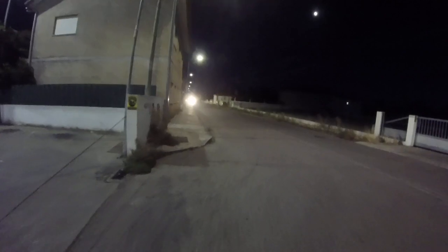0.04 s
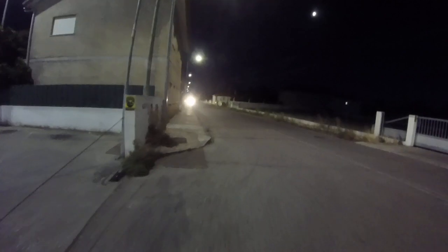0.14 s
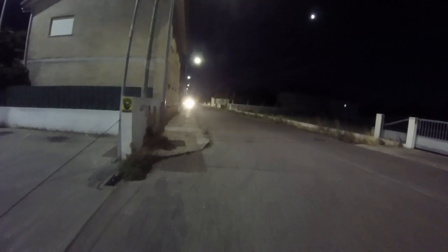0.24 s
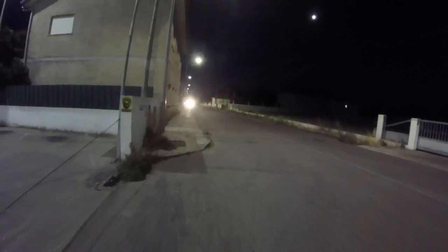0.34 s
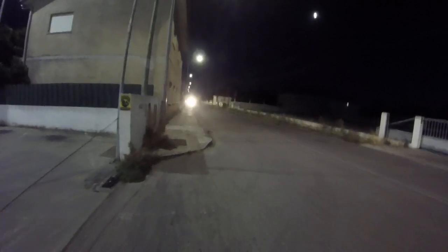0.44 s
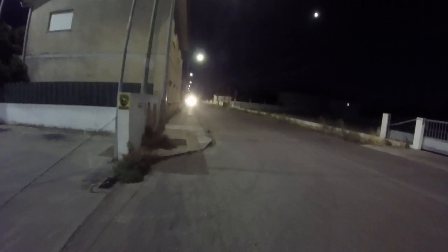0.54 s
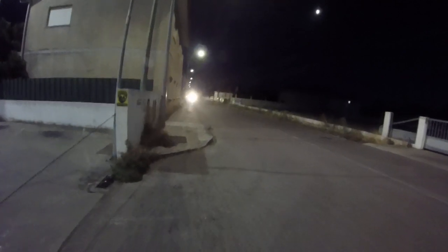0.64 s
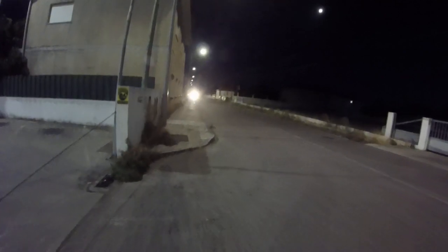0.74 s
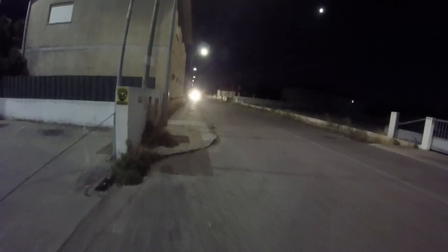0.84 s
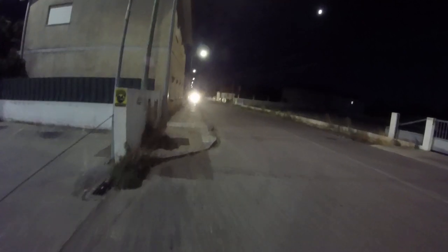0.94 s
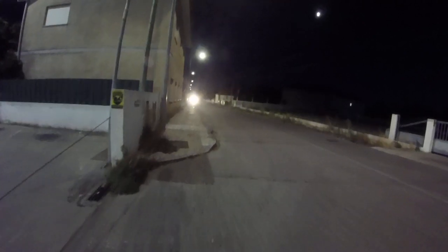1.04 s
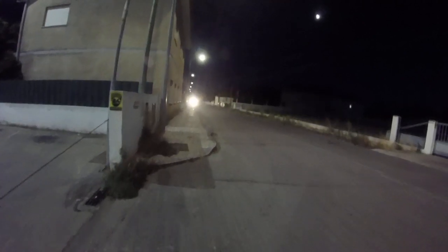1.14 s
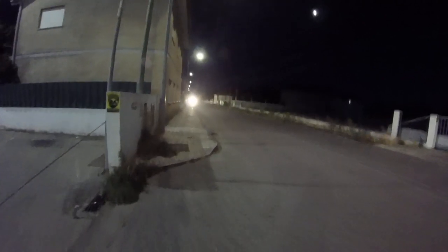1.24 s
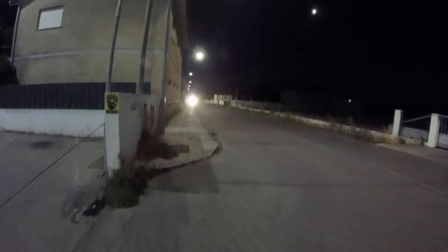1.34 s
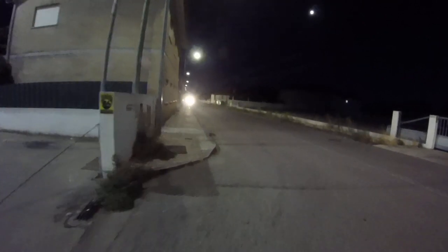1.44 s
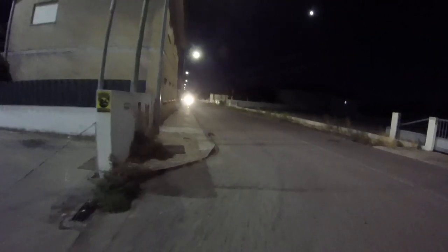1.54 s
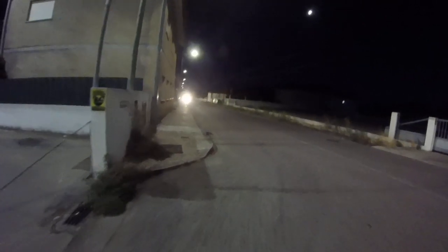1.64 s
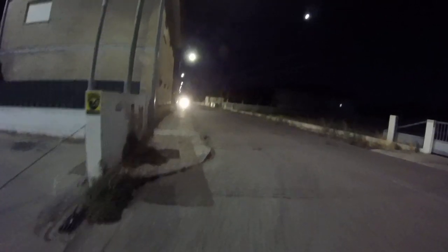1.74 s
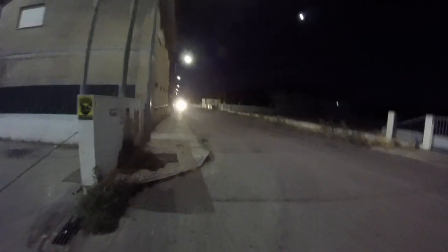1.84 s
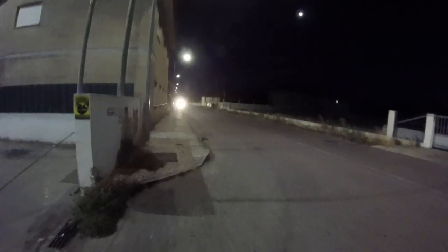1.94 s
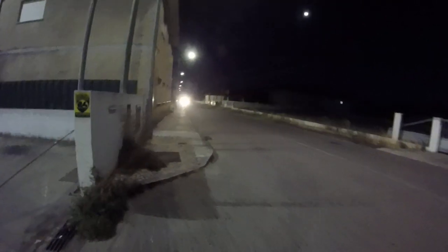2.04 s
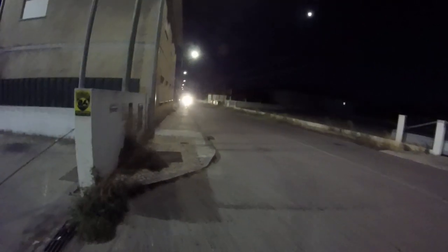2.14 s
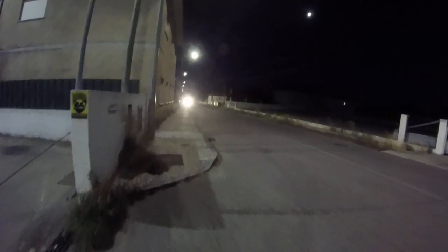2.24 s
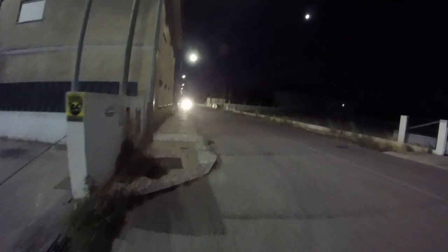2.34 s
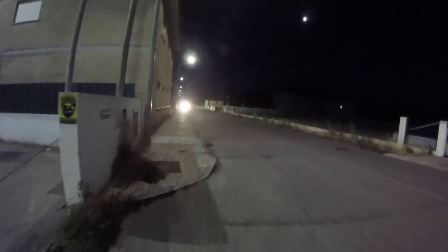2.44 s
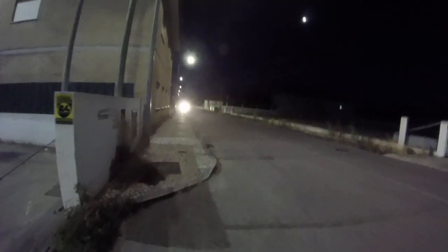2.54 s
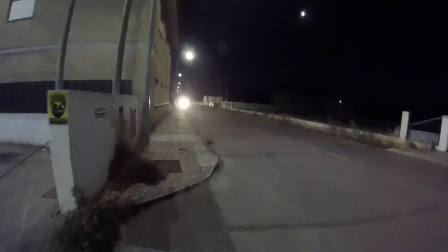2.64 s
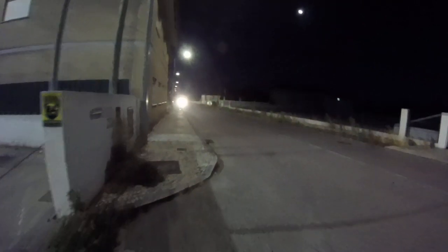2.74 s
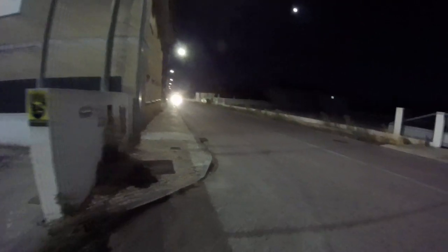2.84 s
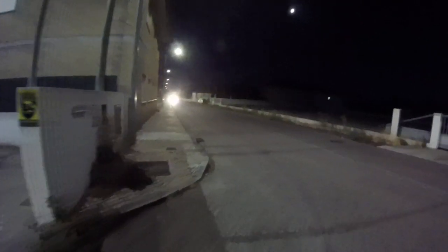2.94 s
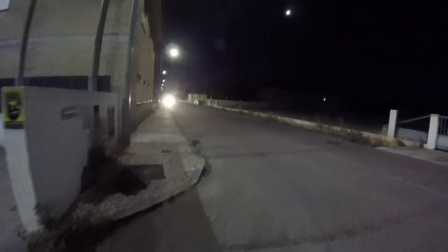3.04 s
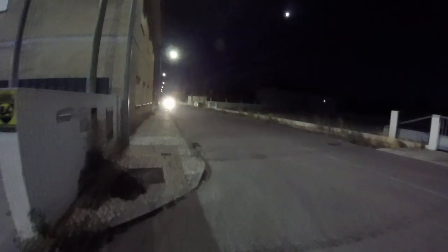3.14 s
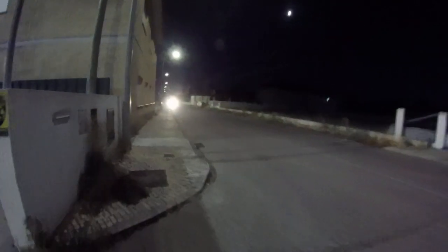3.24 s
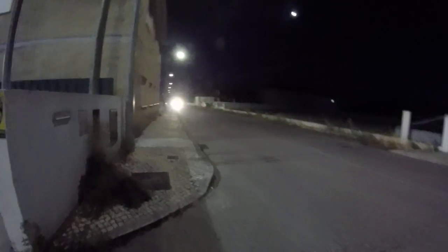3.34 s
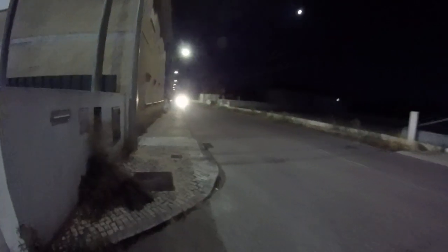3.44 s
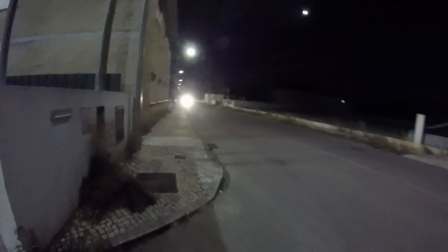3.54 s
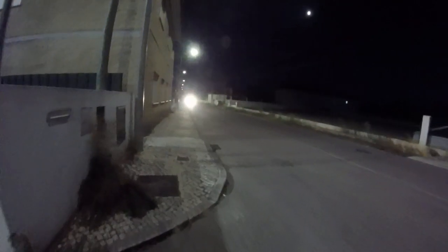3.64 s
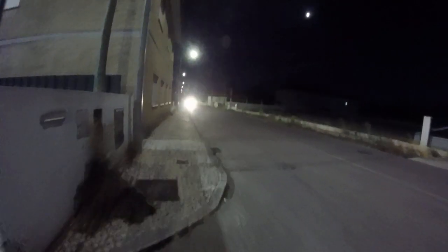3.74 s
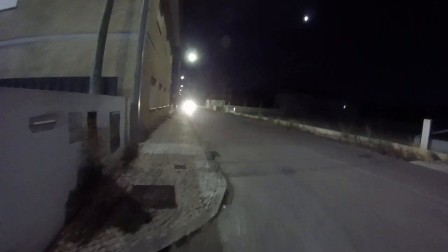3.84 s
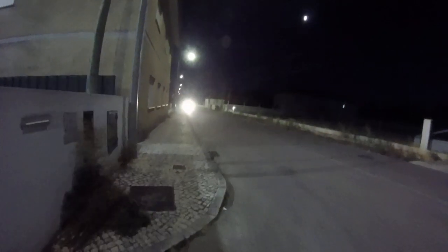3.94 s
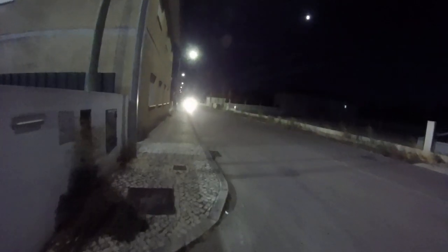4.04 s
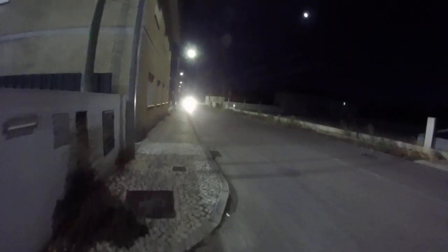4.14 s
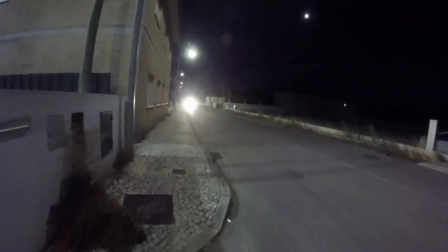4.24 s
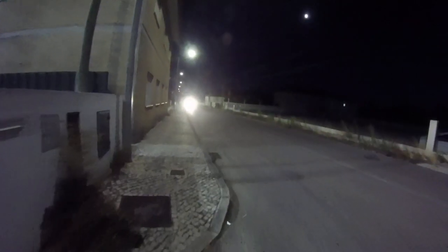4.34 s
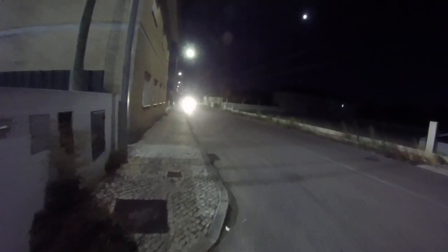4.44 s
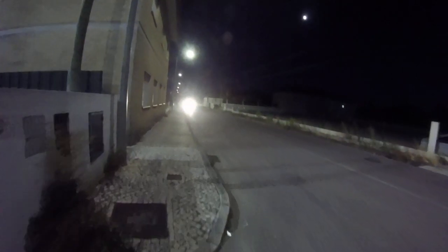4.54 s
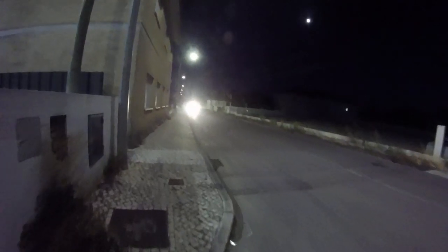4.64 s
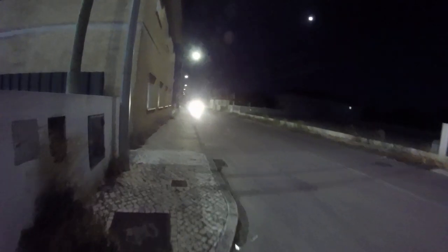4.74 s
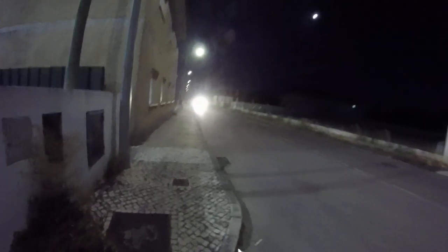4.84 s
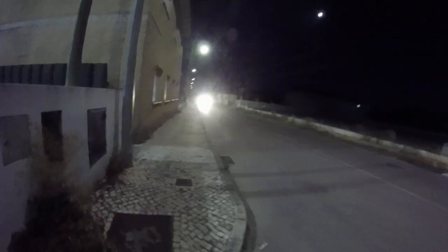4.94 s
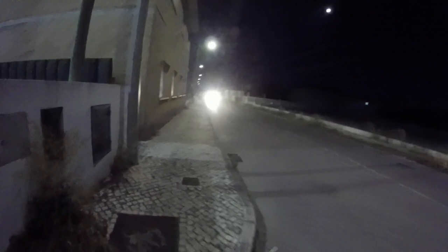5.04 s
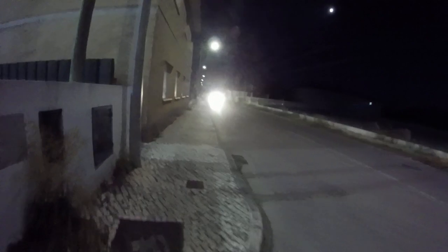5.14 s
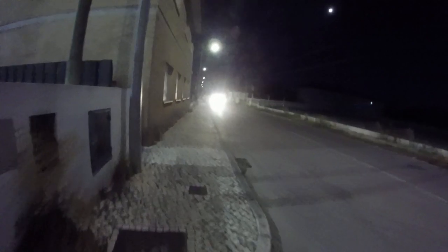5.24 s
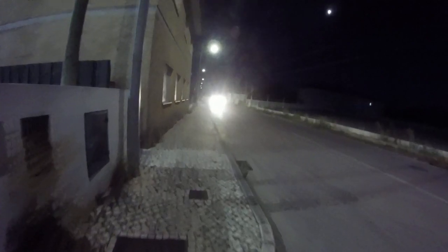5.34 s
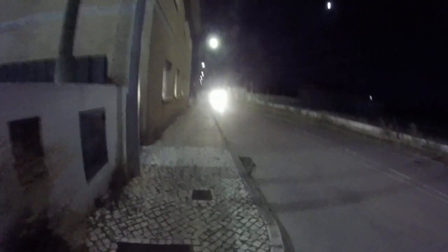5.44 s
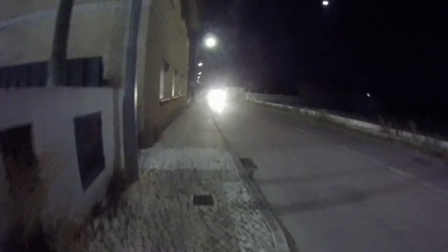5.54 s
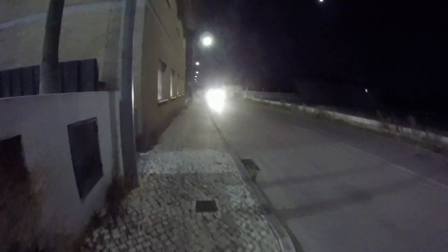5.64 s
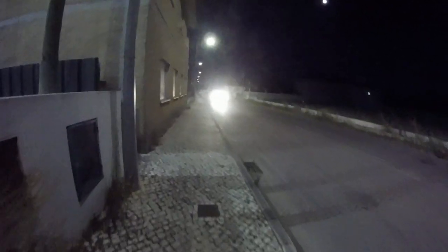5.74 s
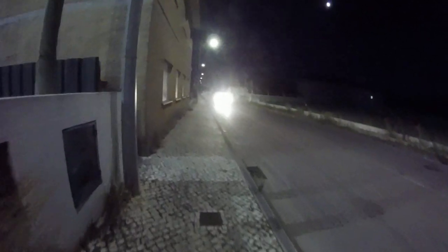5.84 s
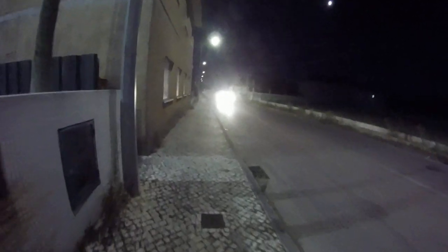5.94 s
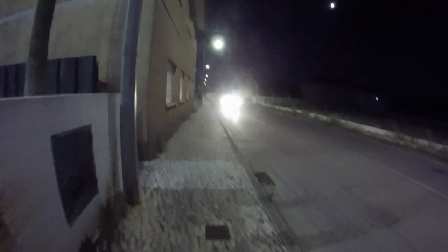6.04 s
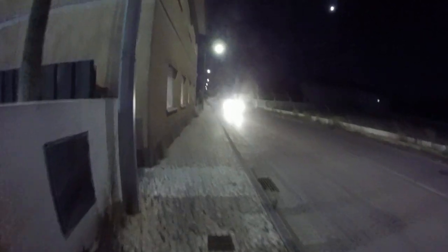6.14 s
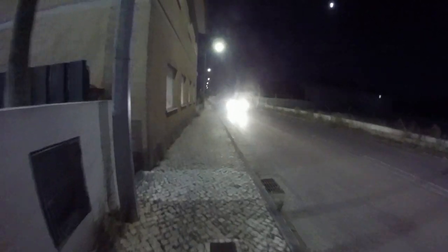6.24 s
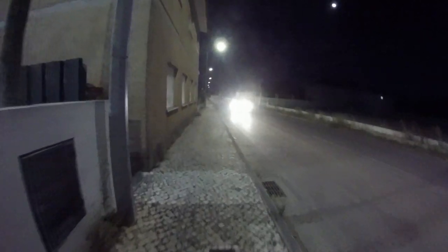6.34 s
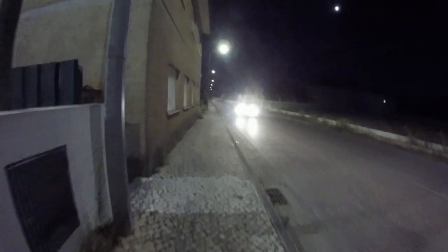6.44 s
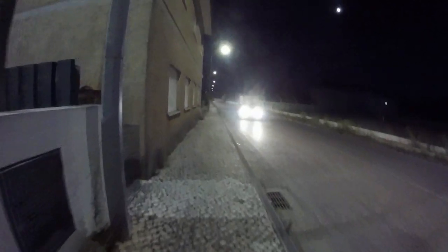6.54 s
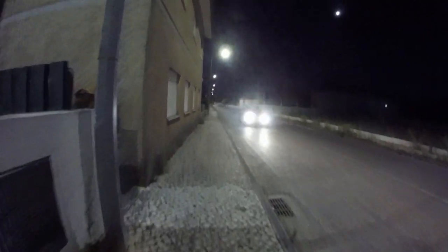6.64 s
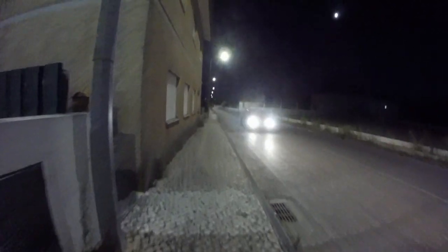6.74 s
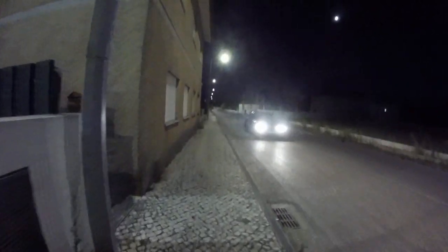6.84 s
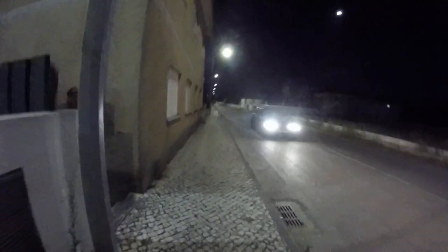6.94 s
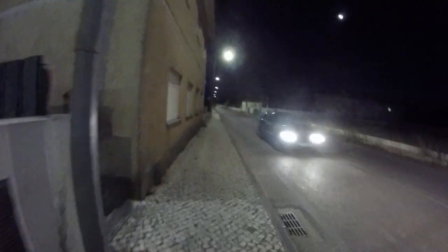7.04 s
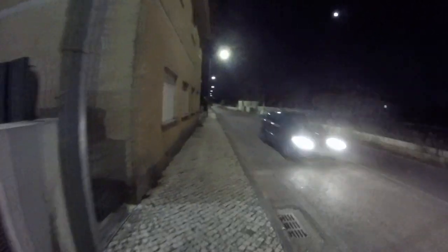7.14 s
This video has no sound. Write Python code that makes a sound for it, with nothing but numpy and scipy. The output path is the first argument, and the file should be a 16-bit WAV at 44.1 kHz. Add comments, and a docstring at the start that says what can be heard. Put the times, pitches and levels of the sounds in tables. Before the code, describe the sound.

Tyre roar and hiss grow steadily as a car draws near, with wind thumping on the microphone partway through.

```python
"""A car approaches at a steady speed along a narrow street at night, heard from the pavement.
Its tyres radiate most of its sound: from afar a roar and a hiss; as the distance falls, a broad wash,
road rumble and the Doppler-shifted hum of the engine join in. A breeze rises to one hard gust whose
turbulence buffets the microphone, brighter the harder it blows. Beneath lies the hush of the town."""
import sys
import numpy as np
from scipy import signal
from scipy.fft import rfft, irfft
from scipy.io import wavfile
from scipy.ndimage import uniform_filter1d, minimum_filter1d, map_coordinates

SR = 44100
rng = np.random.default_rng(int(sys.argv[2]) if len(sys.argv) > 2 else 0)


def persist_wave(psi):
    """Save psi, clipped to +-1, as 16-bit WAV."""
    counts = np.round(np.clip(psi, -1, 1) * 32767).astype(np.int16)
    wavfile.write(sys.argv[1], SR, np.atleast_2d(counts).T)


N = 317079
T = np.arange(N) / SR


def car():
    """Propagation loss: sound grazing the road fades faster than in free air, each part at its own rate."""
    speed_m_s, abreast_at_s, side_m, sound_m_s = 12, 7.33, 6, 343
    reference_m, loss_db_per_decade = 9, 33.5
    ahead_m = speed_m_s * (abreast_at_s - T)
    distance_m = np.hypot(ahead_m, side_m)
    doppler = 1 / (1 - speed_m_s * ahead_m / distance_m / sound_m_s)
    # 0 dB at the reference distance; a part that takes a small share of near_db carries far
    near_db = -loss_db_per_decade * np.log10(distance_m / reference_m)
    tyres = hiss() + wash(near_db) + ring(near_db) + crackle(near_db) + rumble(near_db) + boom()
    return tyres + roar(near_db) + engine(near_db, doppler)


# Spectrum of the drumming tread: f/Hz, level/dB
ROAR_SPECTRUM = [(150, -18.5), (300, -5.5), (400, -15.5), (510, -13.5), (610, -2), (685, 6), (735, 2.5),
                 (810, -4), (870, -6), (940, -18.5), (1010, -18), (1060, -11), (1130, -25), (1250, -26.5),
                 (2000, -48)]
# Surges, slow from afar and quick close by: centre t/s, half-width/s, height/dB, fractional pitch shift
ROAR_SURGES = [(1.8, 0.27, 2.5, 0.00084), (3.1, 0.52, 3.5, 0.000023), (3.845, 0.25, 4.5, 0.0057),
               (5.61, 0.061, 2.5, 0.0034), (6.575, 0.055, 4, 0.07), (6.77, 0.05, 6, -0.0201),
               (6.985, 0.059, 2.5, 0.043)]

def roar(near_db):
    """Impact excitation: tread blocks drum in one hollow band that swells and bends with each surge."""
    surges = np.array([bell(at_s, width_s) ** 2 for at_s, width_s, _, _ in ROAR_SURGES])
    _, _, height_db, shift = np.transpose(ROAR_SURGES)
    sag = .022 * undb(near_db / 2)  # the pitch sinks as the car closes in
    drumming = glide(steady(noise(ROAR_SPECTRUM), span_s=.058), 1 + shift @ surges - sag)
    return drumming * undb(-29 + .86 * near_db + height_db @ surges + .89 * wander(17))


# Spectrum of the air pumped by the tread: f/Hz, level/dB
HISS_SPECTRUM = [(900, -48), (1300, -23), (1550, -23), (1780, -7), (1990, -3.5), (2130, -4), (2330, -20.5),
                 (2550, -25), (2800, -29), (4000, -38.5), (9000, -65)]
# Strength of the hiss: t/s, level/dB
HISS_LEVELS = [(0.0, -63), (0.06, -63), (2.75, -62), (3.3, -55.5), (3.48, -58), (3.72, -53), (4.19, -61.5),
               (4.65, -50), (4.95, -45.5), (5.24, -47.5), (5.42, -42), (5.95, -37.5), (6.31, -37.5),
               (7.06, -33), (7.1, -33.5)]
# Centre of its band: t/s, f/Hz
HISS_CENTRES = [(0, 2068), (4.2, 1987), (4.7, 2064), (5.1, 2078), (5.4, 1980), (5.8, 1989), (6.2, 1909),
                (7.19, 1990)]

def hiss():
    """Air pumping: the tread hisses; reflections off road and wall vary its level and shift its band."""
    unshifted_hz = 2003
    air = glide(noise(HISS_SPECTRUM), curve(HISS_CENTRES) / unshifted_hz)
    return air * undb(curve(HISS_LEVELS) + .5 * wander(25))


# Spectrum of the broad tyre noise: f/Hz, level/dB
WASH_SPECTRUM = [(300, -23), (430, 5.5), (540, -1.5), (850, 6.5), (1150, -5.5), (1600, 0), (2400, -3.5),
                 (2800, -17.5), (3500, -25), (3950, -39), (4450, -18), (5000, -32.5), (6400, -25),
                 (12000, -44.5)]

def wash(near_db):
    """Scintillation: broadband tyre noise wavers as it crosses moving air."""
    return noise(WASH_SPECTRUM) * undb(-33 + 1.052 * near_db + .68 * wander(15))


# Spectrum of the hollow ring in the tyre noise: f/Hz, level/dB
RING_SPECTRUM = [(2500, -14), (2850, -19), (3080, -8.5), (3230, -5), (3350, -6.5), (3520, -12), (3900, -28)]

def ring(near_db):
    """Interference: a hollow ring climbs as the car draws near and its road reflection shifts."""
    lift = .98 + .015 * undb(near_db) ** 2
    return glide(noise(RING_SPECTRUM), lift) * undb(-51.5 + .99 * near_db + 1.8 * wander(22))


# Spectrum of the high tyre crackle, as coloured by the microphone's resonances: f/Hz, level/dB
CRACKLE_SPECTRUM = [(2500, -3), (3950, -5), (4450, 3.5), (5400, 4), (6000, 3), (6450, 8), (7500, -11.5),
                    (8000, 1), (8700, 1), (10000, -9), (11300, -18), (12400, -9), (13800, -25),
                    (15500, -24)]

def crackle(near_db):
    """Shot noise: countless specks of grit, random in strength, crackle in the tread."""
    specks = rng.standard_normal(N) * undb(1.5 * np.minimum(rng.exponential(size=N), 5))
    return colour(specks, CRACKLE_SPECTRUM) * undb(-59.5 + .55 * near_db + .39 * wander(27))


# Spectrum of the shaking tyre walls and body: f/Hz, level/dB
RUMBLE_SPECTRUM = [(20, 4), (60, -9), (130, -11.5), (210, -5.5), (290, -3.5), (370, -6), (480, -16),
                   (800, -24.5)]

def rumble(near_db):
    """Forced vibration: coarse asphalt shakes the tyre walls and the body, whose bass carries far."""
    return noise(RUMBLE_SPECTRUM) * undb(-36.5 + .63 * near_db + wander(9.2))


# Spectrum of the booming tyre walls: f/Hz, level/dB
BOOM_SPECTRUM = [(160, -17), (200, -5), (260, -3), (300, 3), (335, -9), (420, -22)]

def boom():
    """Reflection: a house front returns the boom of the tyre walls for a moment."""
    return steady(noise(BOOM_SPECTRUM), span_s=.15) * undb(-37) * bell(at_s=6.444, width_s=.38)


# Orders of the exhaust note: multiple of the firing rate, relative level/dB
EXHAUST_ORDERS = [(1, -1), (2, -14.5), (3, -10.5), (4, -15.5), (4.5, -14), (5, -14.5)]

def engine(near_db, doppler):
    """Periodic firing: four cylinders hum in slightly uneven orders, raised by the Doppler effect."""
    firing_hz = 54.83 * (1 + .005 * wander(20))
    phase = 2 * np.pi * np.cumsum(firing_hz * doppler) / SR
    note = sum(undb(db + 1.4 * wander(6.9)) * np.sin(order * phase + rng.uniform(0, 2 * np.pi))
               for order, db in EXHAUST_ORDERS)
    return unit(note) * undb(-28.5 + .95 * near_db)


# Spectra of big eddies, small eddies and flutter in the microphone port: f/Hz, level/dB
SWING_SPECTRUM = [(8, -21), (18, 9.5), (32, -0.5), (75, -0.5), (120, -17), (220, -26), (500, -56)]
EDDY_SPECTRUM = [(50, -4.5), (90, 5), (130, 3.5), (170, 2.5), (205, 2), (260, -4), (330, -4), (480, -21.5),
                 (700, -41), (950, -56), (2000, -47)]
FLUTTER_SPECTRUM = [(200, -24), (400, 3.5), (560, 2), (720, 1.5), (900, -25), (1100, -25), (2000, -52)]

def wind():
    """Turbulence: big eddies swing the diaphragm slowly, small ones ruffle it, and the port flutters."""
    swings = steady(noise(SWING_SPECTRUM), span_s=.0574)
    crests = unit(1 + .5 * np.abs(swings))  # small eddies ride on the crests of the big ones
    eddies = steady(noise(EDDY_SPECTRUM), span_s=.024) * crests * undb(1.26 * wander(45))
    flutter = steady(noise(FLUTTER_SPECTRUM), span_s=.05) * crests * undb(1.5 * wander(70))
    return breeze(swings, eddies, flutter) + puffs(swings, eddies, flutter) + knock()


# Strength of the wind at the microphone: t/s, level/dB
WIND_LEVELS = [(1.9, -58), (2.15, -52), (2.65, -54.5), (2.95, -45), (3.2, -48), (3.56, -44.5), (3.68, -40),
               (4.0, -33.5), (4.24, -34.5), (4.42, -31.5), (4.5, -46.5), (4.87, -35.5), (4.93, -29.5),
               (4.99, -25), (5.05, -26), (5.12, -21.5), (5.22, -18), (5.28, -16.5), (5.36, -18),
               (5.44, -22.5), (5.58, -30), (5.68, -27), (5.82, -38.5), (7.19, -34)]

def breeze(swings, eddies, flutter):
    """Power-law growth: port flutter rises faster than the eddies, so harder wind sounds brighter."""
    wind_db = curve(WIND_LEVELS) + .8 * wander(24)  # quick buffets move all three together
    gust_db = -15
    return (swings * undb(wind_db)
            + eddies * undb(-20 + (wind_db - gust_db))
            + flutter * undb(-26 + 1.63 * (wind_db - gust_db)))


# Single puffs: start t/s, length/s, swing level/dB, eddy level/dB, flutter level/dB
WIND_PUFFS = [(1.049, 0.055, -52, -57, -86), (2.05, 0.033, -50, -60, -78), (2.237, 0.067, -41, -60, -57),
              (2.823, 0.044, -42, -71, -74), (2.925, 0.065, -44, -55, -75), (3.03, 0.061, -47, -61, -73),
              (3.399, 0.071, -43, -72, -75), (3.61, 0.033, -48, -42, -46), (3.651, 0.038, -31.5, -62, -53),
              (3.768, 0.028, -33.5, -46, -65), (3.852, 0.034, -42, -47, -49.5),
              (3.907, 0.019, -29, -52, -69), (4.059, .018, -35, -42, -58), (4.121, 0.036, -41, -38.5, -59),
              (4.204, 0.012, -36, -43, -54), (4.298, 0.073, -40, -37, -49), (4.415, 0.024, -35, -42, -64),
              (4.634, 0.022, -27, -36, -50), (4.77, 0.043, -33, -40.5, -52), (4.9, .018, -25, -28, -40.5),
              (4.938, 0.025, -27, -28, -40), (5.07, 0.046, -14.5, -38, -45), (5.079, 0.017, -14, -29, -30),
              (5.127, 0.017, -30, -17.5, -27.5), (5.163, 0.027, -15, -26.5, -24),
              (5.21, 0.02, -18, -15.5, -42), (5.254, 0.019, -29, -29, -29), (5.488, 0.028, -16.5, -37, -44),
              (5.525, 0.021, -14.5, -28.5, -41), (5.563, 0.025, -20.5, -40, -47),
              (5.622, 0.014, -18.5, -48, -45), (5.654, 0.0076, -27, -46, -60),
              (5.716, 0.02, -46, -32.5, -37), (5.749, 0.029, -45, -35.5, -42),
              (6.458, 0.096, -28, -34.5, -60), (7.102, .1, -26.5, -33.5, -58)]

def puffs(swings, eddies, flutter):
    """Dynamic pressure: a glancing puff is a dull thump; a direct one sets the port fluttering too."""
    attack_s, release_s = .015, .0053
    thumps = np.zeros(N)
    for start_s, length_s, swing_db, eddy_db, flutter_db in WIND_PUFFS:
        rise = np.clip((T - start_s) / attack_s + .5, 0, 1)
        fall = np.exp(-np.clip((T - start_s - length_s) / release_s, 0, 20))
        air = undb(swing_db) * swings + undb(eddy_db) * eddies + undb(flutter_db) * flutter
        thumps += rise * fall * air
    return thumps


# Spectrum of an eddy striking the port: f/Hz, level/dB
KNOCK_SPECTRUM = [(150, 2), (400, -3), (750, 2.5), (1000, -23), (1450, -15), (1800, -35)]

def knock():
    """Stagnation pressure: at the height of the gust one eddy hits the port head-on."""
    pulse = bell(at_s=5.182, width_s=.0086) ** 2
    return undb(-19.5) * pulse * steady(noise(KNOCK_SPECTRUM), span_s=.0052)


# Spectrum of a snapping grain: f/Hz, level/dB
STONE_SPECTRUM = [(2000, 2), (3200, 9), (5000, 12), (8000, -12), (11000, -9), (15000, -23)]
# Grains on the road: t/s, level/dB, decay time/s, frequency ratio
STONE_TICKS = [(.58, -60, 0.008, 1.5), (1.245, -46.5, 0.0044, 0.46), (2.439, -54, .006, 0.75),
               (2.645, -62, 0.0032, 0.72), (3.119, -53, .005, 0.49), (6.545, -60, 0.03, 2.36)]

def stones():
    """Damped transients: single grains snap or scrape on the asphalt; small ones sound higher."""
    attack_s = .0012
    ticks = np.zeros(N)
    for at_s, db, decay_s, pitch in STONE_TICKS:
        envelope = np.clip((T - at_s) / attack_s, 0, 1) * np.exp(-np.abs(T - at_s) / decay_s)
        ticks += undb(db) * envelope * noise(np.array(STONE_SPECTRUM) * [pitch, 1])
    return ticks


# Spectrum of the town at night: f/Hz, level/dB
TOWN_SPECTRUM = [(20, -5.5), (60, 3.5), (90, 1), (120, -0.5), (175, 0), (230, -4), (400, -4), (460, -0.5),
                 (700, -7), (950, -11), (1400, -15), (2050, -18), (2600, -18.5), (4400, -23), (7000, -29),
                 (12000, -36), (15500, -45)]

def town():
    """Incoherent addition: far traffic and night air merge into a hush."""
    return noise(TOWN_SPECTRUM) * undb(-52 + .26 * wander(2.1))


def undb(db):
    """Decibels to amplitude ratio."""
    return 10 ** (np.asarray(db) / 20)


def unit(x):
    """Normalisation to rms 1."""
    return x / np.sqrt(np.mean(x ** 2))


def curve(table):
    """Linear interpolation of (t/s, value) points at every sample."""
    return np.interp(T, *np.transpose(table))


def bell(at_s, width_s):
    """A Gaussian envelope, down to 1/e at width_s from its peak."""
    return np.exp(-((T - at_s) / width_s) ** 2)


def colour(x, spectrum):
    """Spectral shaping by (f/Hz, level/dB) points, at rms 1; the result loops smoothly."""
    hz, db = np.transpose(spectrum)
    f = np.maximum(np.arange(N // 2 + 1) * SR / N, 1)
    skirts = np.minimum(f / hz[0], 1) ** 2 * np.minimum(hz[-1] / f, 1) ** 2
    gain = undb(np.interp(np.log(f), np.log(hz), db))
    return unit(irfft(rfft(x) * skirts * gain, N))


def noise(spectrum):
    """Gaussian noise with the given spectral shape, at rms 1."""
    return colour(rng.standard_normal(N), spectrum)


def wander(rate_hz):
    """Smooth random modulation of spread about 1, with rate_hz new values a second."""
    return map_coordinates(rng.standard_normal(1024), [T * rate_hz], order=3, mode="wrap")


def steady(x, span_s):
    """Division by the running rms holds the strength of x even over span_s."""
    return x / np.sqrt(uniform_filter1d(x ** 2, int(span_s * SR)) + 1e-9)


def glide(x, ratio):
    """Resampling shifts every band of x by a moving frequency ratio."""
    return map_coordinates(x, [np.cumsum(ratio)], order=3, mode="grid-wrap")


def scene():
    """Superposition: car, grains, wind and town add at one microphone."""
    return (car() + stones() + wind() + town())[None]


def record(dry):
    """Peak limiting holds down the biggest wind peaks; a low-pass filter cuts the top."""
    ceiling, window_samples, top_hz = .62, 441, 15300
    needed = np.minimum(1, ceiling / (np.abs(dry) + 1e-9))
    held = minimum_filter1d(needed, 2 * window_samples)
    gain = uniform_filter1d(uniform_filter1d(held, window_samples), window_samples)
    fade_out = np.minimum(1, (T[-1] - T) / .004)
    lowpass = signal.ellip(8, .2, 80, top_hz, fs=SR, output="sos")
    return signal.sosfilt(lowpass, gain * fade_out * dry)


dry = scene()
out = record(dry)
persist_wave(out)
```